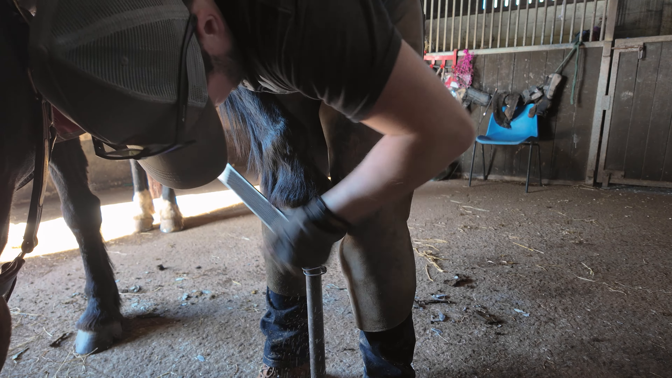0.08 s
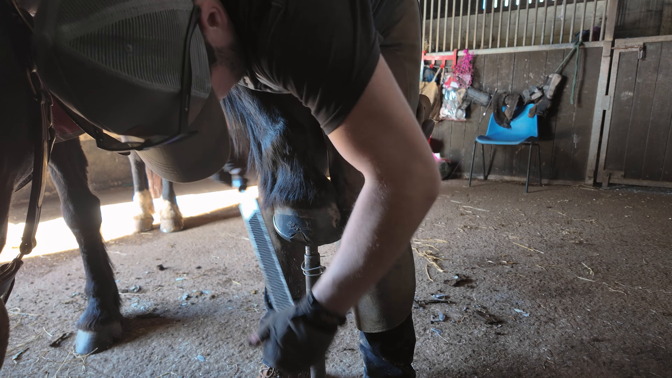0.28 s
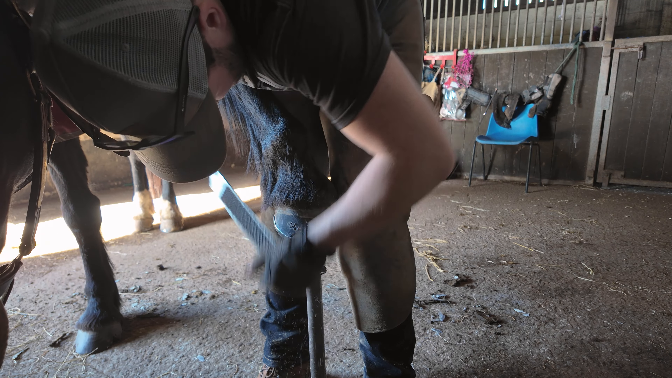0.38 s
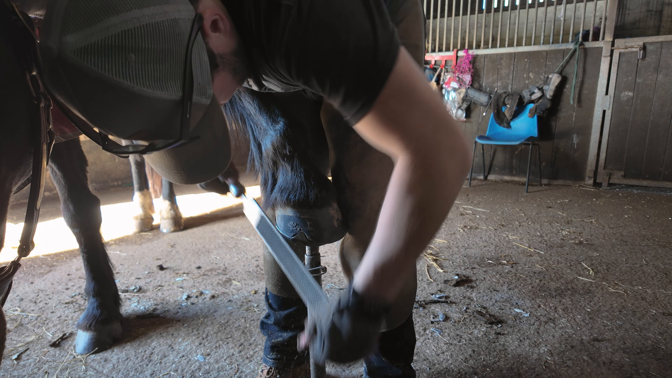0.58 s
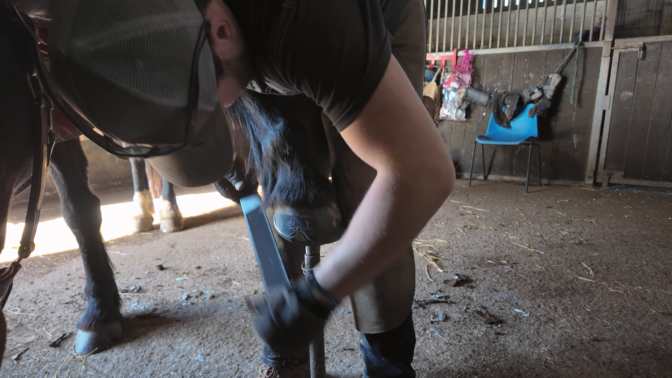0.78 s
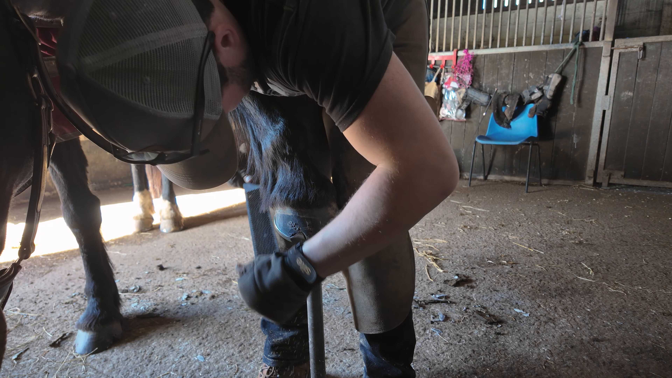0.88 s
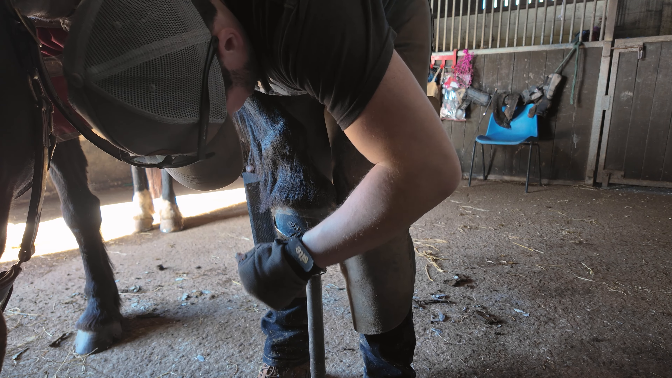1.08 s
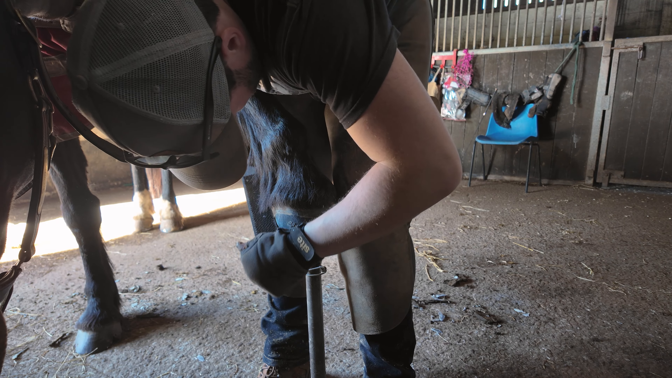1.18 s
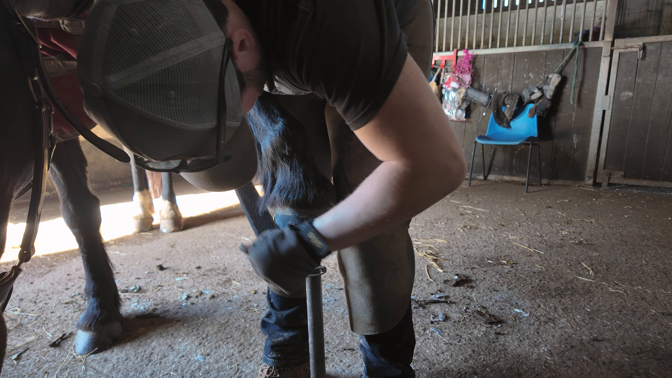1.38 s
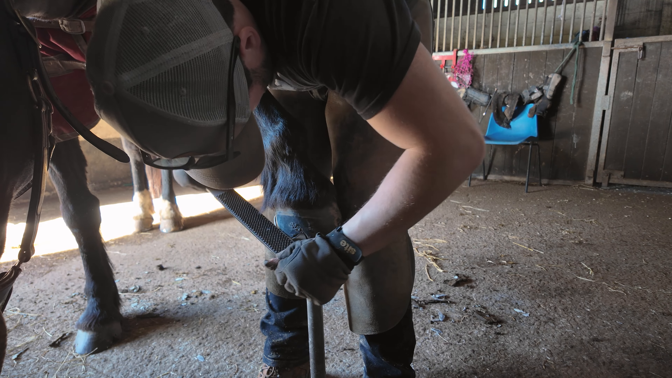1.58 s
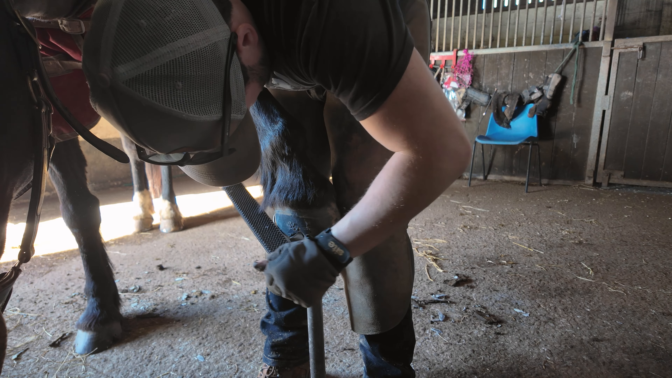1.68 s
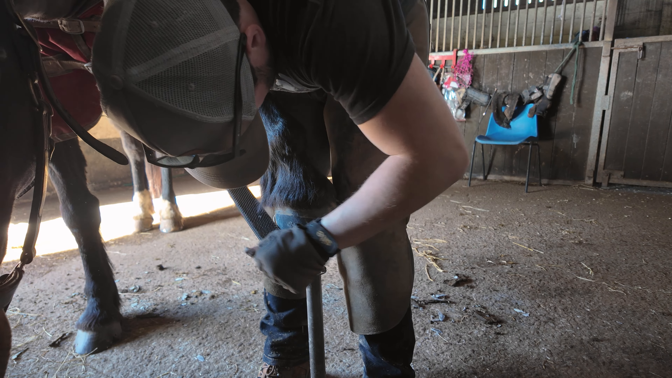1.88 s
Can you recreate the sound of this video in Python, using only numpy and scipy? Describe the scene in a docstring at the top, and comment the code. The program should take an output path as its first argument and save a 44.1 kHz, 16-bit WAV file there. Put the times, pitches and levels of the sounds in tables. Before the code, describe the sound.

Coarse file rasping on hoof horn in a stable, two loud strokes followed by faint scrapes

```python
"""A farrier files a hoof held on a stand in a stable.
From the start: air hush and the light drag of the blade (noise), a faint blade ring, hoof and stand
tones (resonators) and sparse echoes. From 0.16 s and 0.55 s, two hard strokes: random tooth bites tear
horn and ring blade tones weighted by the place touched, tip to heel; noise bursts mark the landings
and sine thumps the rocking stand. From 1.04 s: lighter touches by the same means."""
import sys
import numpy as np
from scipy import signal
from scipy.fft import rfft, irfft
from scipy.io import wavfile

SR = 44100
rng = np.random.default_rng(int(sys.argv[2]) if len(sys.argv) > 2 else 0)


def unload_wav(signal):
    """Save mono or channel-first audio to the path in sys.argv[1] as 16-bit WAV at rate SR, clipped to [-1, 1]."""
    wavfile.write(
        sys.argv[1],
        SR,
        np.round(np.clip(np.atleast_2d(signal).T, -1, 1) * 32767).astype(np.int16),
    )


def gain_from_db(level_db):
    """Convert decibel levels to linear amplitude factors (20 dB per decade)."""
    decades = np.asarray(level_db, float) / 20
    return 10 ** decades


N = 83790


def evened(x):
    """Scales x to power 1."""
    return x / np.sqrt(np.mean(x ** 2) + 1e-20)


def read(points, hz):
    """Interpolates a (hz, value) table over log frequency."""
    f, value = np.transpose(points)
    return np.interp(np.log(hz + 1), np.log(f + 1), value)


def follow(rows, column, outside=None):
    """One column of a timed table as a value for every sample."""
    rows = np.array(rows)
    return np.interp(np.arange(N) / SR, rows[:, 0], rows[:, column], outside, outside)


def colour(x, points):
    """Shapes the spectrum of x by (hz, db), keeping about its power if x is white."""
    gain = gain_from_db(read(points, np.fft.rfftfreq(N, 1 / SR)))
    return irfft(rfft(x) * evened(gain), N)


def resonate(x, hz, width_hz):
    """Double-pole ring with steep flanks, following pitch hz; white noise keeps about its power."""
    r = np.exp(-np.pi * np.sqrt(2) * abs(width_hz) / SR)
    turn = np.exp(2j * np.pi * np.cumsum(hz * np.ones(N)) / SR)
    ring = turn * signal.lfilter([1], [1, -2 * r, r * r], x / turn)
    return np.sqrt(2 * (1 - r * r) ** 3 / (1 + r * r)) * ring.real


def wander(hz):
    """Random drift of power 1, low-passed at hz."""
    return evened(signal.lfilter(*signal.butter(2, hz, fs=SR), rng.standard_normal(N)))


def bites(per_s, spread_db):
    """Teeth catching at random moments, a few of them hard, over weak noise; power 1."""
    size = gain_from_db(spread_db * np.minimum(rng.exponential(1, N), 4)) * rng.choice([-1., 1.], N)
    caught = size * (rng.random(N) < per_s / SR)
    return evened(caught + 0.3 * rng.standard_normal(N))


# stable air spectrum: pitch_hz [Hz], level_db [dB, relative]
AIR_COLOUR = [(30, -2), (95, 2), (180, -6), (350, -4.5), (1000, -21), (1800, -14.5), (4000, -19),
              (7000, -30), (14000, -45)]
AIR_DB = -60.5


def air():
    """Coloured noise: soft hush of the stable, its level drifting slowly."""
    hush = evened(colour(rng.standard_normal(N), AIR_COLOUR))
    return gain_from_db(AIR_DB + 3.8 * wander(1.1)) * hush


# light drag of the blade coming back: start_s [s], level_db [dB]
DRAG = [(0, -47.5), (.03, -51.5), (.15, -51.5), (.4, -70), (.47, -52), (.54, -57), (.78, -51), (.85, -55),
        (.89, -58), (.945, -53.5), (.975, -65), (1.15, -59.5), (1.4, -63.5), (1.63, -54.5), (1.68, -71),
        (1.9, -55.5)]


def drag_bites():
    """Sparse weak tooth catches of the returning blade."""
    return gain_from_db(follow(DRAG, column=1)) * bites(1500, 3.2)


# drag spectrum: pitch_hz [Hz], level_db [dB, relative]
DRAG_COLOUR = [(250, -3.5), (1500, -9.5), (2500, -3), (6500, -7.5), (8000, -16), (11000, -27), (15600, -36)]


def drag_scrape(drag):
    """The drag heard directly, as coloured noise."""
    return colour(drag, DRAG_COLOUR)


# steel blade modes: pitch_hz [Hz], width_hz [Hz], tip_db, heel_db [dB when touched there, relative]
BLADE = [(1720, 220, -9.5, -8), (3014, 84, -5, -13.5), (3505, 44, -28.5, -3.5), (3877, 71, 0.5, -10),
         (4482, 39, -3, -14), (4770, 87, -8.5, 6.5), (5366, 75, -1, -11.5), (6027, 156, 9, -20),
         (6590, 150, -5.5, -9), (6960, 46, 0, -43), (7702, 35, -17, -9), (8920, 69, -22.5, -13),
         (9600, 160, -23, -28), (10610, 83, -29.5, -23), (11650, 20, -30.5, -20.5), (12000, 25, -40, -19)]
RING_DB, DRAG_RING_DB, TAP_RING_DB = -9, -14, 9
BLADE_SAG = 0.018  # share of pitch by which tones are sharp when a hard stroke lands
WOBBLE, WOBBLE_HZ = 0.0076, 47.4  # rms share of pitch under the hardest bite
TONE_FLICKER_DB = 5.5


def blade_ring(cut, drag, tap, hard):
    """Bites, drag and taps excite steel modes, weighted by contact place and bent by pressure."""
    drive = cut + gain_from_db(DRAG_RING_DB) * drag + gain_from_db(TAP_RING_DB) * tap
    at, fresh = contact_place(), freshness()
    ring = np.zeros(N)
    for pitch_hz, width_hz, tip_db, heel_db in BLADE:
        level_db = tip_db + (heel_db - tip_db) * at + TONE_FLICKER_DB * hard * wander(45.3)
        bend = 1 + BLADE_SAG * fresh + WOBBLE * hard * wander(WOBBLE_HZ)
        ring += resonate(drive * gain_from_db(level_db), pitch_hz * bend, width_hz)
    return gain_from_db(RING_DB) * ring


# force passed into hoof and stand: start_s [s], push_db [dB]
PUSH = [(0, -49), (.03, -58), (.21, -65), (.235, -30.5), (.34, -41.5), (.38, -36.5), (.41, -70),
        (.59, -49.5), (.625, -33), (.71, -43.5), (.76, -41), (.82, -65.5), (1.03, -73), (1.05, -48),
        (1.11, -58), (1.13, -111), (1.188, -52), (1.197, -42.5), (1.29, -45.5), (1.32, -62), (1.54, -60.5),
        (1.58, -53), (1.62, -61.5), (1.835, -63), (1.855, -45.5), (1.9, -56.5)]
THUD_DB, THUD_HZ, THUD_WIDTH_HZ = 0, 317, 590


def hoof_drive():
    """Uneven push of the file plus a dull thud at each landing."""
    push = gain_from_db(follow(PUSH, column=1) + 2.2 * wander(49)) * bites(2500, 2.44)
    landing = landing_bursts([level_db + thud_db for start_s, level_db, thud_db in LANDINGS])
    return push + gain_from_db(THUD_DB) * resonate(landing, THUD_HZ, THUD_WIDTH_HZ)


# fixed hoof and stand modes: pitch_hz [Hz], width_hz [Hz], level_db [dB, relative]
HOOF = [(294, 108, -2), (497.4, 31.6, -2), (814, 137, -0.5), (1063, 78, -7.5), (1293, 59, -6.5)]
# hoof mode sinking as a hard stroke settles: first_hz, last_hz, width_hz [Hz], level_db [dB, relative]
SLIDING = (590, 449.6, 27.5, 0.46)
HOOF_DB, PRESSED_DB = -6, -5  # pressing damps the fixed modes


def hoof_tones():
    """Push and thuds shake dull modes; one more sounds only under pressure and sinks in pitch."""
    drive, pressed = hoof_drive(), pressing()
    first_hz, last_hz, width_hz, level_db = SLIDING
    sinking_hz = last_hz + (first_hz - last_hz) * freshness()
    tones = gain_from_db(level_db) * resonate(drive * pressed, sinking_hz, width_hz)
    damped = drive * gain_from_db(PRESSED_DB * pressed)
    for pitch_hz, width_hz, level_db in HOOF:
        tones = tones + gain_from_db(level_db) * resonate(damped, pitch_hz, width_hz)
    return gain_from_db(HOOF_DB) * tones


# echo dying time: pitch_hz [Hz], t60_s [s]
ROOM_T60 = [(300, 0.68), (5000, 0.31), (12000, 0.4)]
ROOM_DB = -13.5


def stable_echo(x):
    """Sparse echoes of random sign, each band dying at its own speed."""
    taps = np.zeros(SR // 2)
    at = np.arange(200, len(taps) - 20, 20)
    taps[at + rng.integers(0, 20, len(at))] = rng.choice([-1., 1.], len(at))
    hz, t, z = signal.stft(taps, SR, nperseg=256)
    decay = gain_from_db(-60 * t / read(ROOM_T60, hz)[:, None])
    tail = signal.istft(z * decay, SR, nperseg=256)[1]
    return gain_from_db(ROOM_DB) * signal.fftconvolve(x, tail / np.linalg.norm(tail))[:N]


# cutting contacts, one list per touch: start_s [s], bite_db [dB], place [0 tip - 1 heel]
CUTS = [
    [(.16, -45, 0.089), (.168, -45.5, 0.24), (.206, -44.5, 0.18), (.232, -20.5, 0.49), (.25, -24.5, 0.12),
     (.28, -30, 0.37), (.296, -26.5, 0.091), (.322, -28.5, 0.57), (.348, -29, 0.35), (.372, -37, 0.31),
     (.385, -48, 1), (.41, -74, 0.45)],
    [(.552, -53, 0.072), (.558, -37, 0.12), (.592, -39.5, 0.064), (.624, -27, 0.26), (.656, -28, 0.35),
     (.672, -27.5, 0.16), (.708, -20.5, 0.5), (.724, -30, 0.34), (.746, -26.5, 0.87), (.76, -83, .75)],
    [(1.039, -45, 0.45), (1.044, -47.5, 0.71), (1.09, -65, 0.57)],
    [(1.19, -112.5, 0.62), (1.197, -56, 0.52), (1.22, -54, 0.36), (1.286, -38.5, 0.24), (1.302, -90, 1)],
    [(1.52, -64.5, 0.8), (1.576, -33.5, 0.86), (1.59, -56, 0.9), (1.61, -56, 0.9), (1.65, -79, 0.63)],
    [(1.832, -75, 0.59), (1.838, -48.5, 0.57), (1.9, -54, 0.84)],
]
CHATTER_DB, CHATTER_HZ, HARD_DB = 2, 70, -33  # hardness is half at HARD_DB


def bite_force():
    """Force of the teeth on the horn, and its hardness from 0 to 1."""
    force = sum(gain_from_db(follow(rows, column=1, outside=-200)) for rows in CUTS)
    return force, force / (force + gain_from_db(HARD_DB))


def contact_place():
    """Where the blade is touched, 0 tip to 1 heel."""
    return np.clip(follow(np.concatenate(CUTS), column=2), 0, 1)


# horn tearing spectrum: pitch_hz [Hz], level_db [dB, relative]
SHAVING = [(300, -10.5), (900, 0), (1800, -6.5), (4500, -1.5), (6800, -3.5), (8000, -13.5), (10000, -19),
           (13000, -35.5), (15600, -36)]
SHAVING_DB = -7.5


def shaving(chatter):
    """Horn tearing off: dense random catches, coloured."""
    return colour(gain_from_db(SHAVING_DB) * chatter * bites(7000, 2.2), SHAVING)


# hard strokes: landing_s [s], lift_s [s]
HARD_STROKES = [(.16, .385), (0.55, .745)]
SETTLE_S, LINGER_S = 0.147, 0.069


def freshness():
    """1 from the landing of a hard stroke, sinking to 0 over its last SETTLE_S."""
    t = np.arange(N) / SR
    return sum((t > landing_s) * np.clip((lift_s - t) / SETTLE_S, 0, 1)
               for landing_s, lift_s in HARD_STROKES)


def pressing():
    """1 during a hard stroke and LINGER_S after its lift, else 0."""
    t = np.arange(N) / SR
    return sum((t > landing_s) * (t < lift_s + LINGER_S) for landing_s, lift_s in HARD_STROKES)


# blade set down on the horn, or snagging: start_s [s], level_db [dB], thud_db [dB re level_db]
LANDINGS = [(0.1647, -41.5, -7.5), (0.5545, -39, -3), (.706, -39, -4), (1.0415, -47.5, 1), (1.195, -49, 2),
            (1.562, -58.5, -4)]


def landing_bursts(levels_db):
    """A noise burst decaying over a few ms at each landing, low-passed."""
    out, t = np.zeros(N + SR), np.arange(400) / SR
    for (start_s, *_), level_db in zip(LANDINGS, levels_db):
        burst = rng.standard_normal(len(t)) * np.exp(-t / 0.0035)
        out[round(start_s * SR):][:len(t)] += gain_from_db(level_db) * burst
    return signal.lfilter(*signal.butter(2, 7500, fs=SR), out[:N])


def landing_tick(tap):
    """Broad short resonance of each landing."""
    tick_db, tick_hz, width_hz = 5, 1540, 2040
    return gain_from_db(tick_db) * resonate(tap, tick_hz, width_hz)


# stand rocking on the floor: start_s [s], level_db [dB], pitch_hz [Hz], t60_s [s]
THUMPS = [(0.219, -37, 101.4, 0.17), (0.31, -36.5, 93.4, 0.31), (.556, -35, 117, 0.065),
          (0.693, -40.5, 110.8, 0.24), (1.041, -24.5, 129, 0.042), (1.174, -40.5, 117, 0.12),
          (1.221, -32, 128, 0.079), (1.572, -34, 116.5, 0.084), (1.841, -44.5, 119, 0.19)]
THUMP_RISE_S = 0.0072


def stand_thumps():
    """Low sines with a soft onset and exponential decay."""
    out = np.zeros(N)
    for start_s, level_db, pitch_hz, t60_s in THUMPS:
        t = np.maximum(np.arange(N) / SR - start_s, 0)
        envelope = gain_from_db(level_db - 60 * t / t60_s) * (1 - np.exp(-t / THUMP_RISE_S))
        out += envelope * np.sin(2 * np.pi * pitch_hz * t)
    return out


def scene():
    """File, hoof and stand, with the stable's echoes and air."""
    force, hard = bite_force()
    chatter = force * gain_from_db(CHATTER_DB * wander(CHATTER_HZ))
    cut = chatter * bites(per_s=3500, spread_db=4)
    drag = drag_bites()
    tap = landing_bursts([level_db for start_s, level_db, thud_db in LANDINGS])
    rasp = drag_scrape(drag) + blade_ring(cut, drag, tap, hard) + shaving(chatter) + landing_tick(tap)
    near = rasp + hoof_tones() + stand_thumps()
    return (near + stable_echo(near) + air())[None]


def low_pass(x):
    """Removes everything above the highest recorded frequency."""
    return signal.sosfilt(signal.butter(12, 15690, fs=SR, output="sos"), x)


def record(dry):
    """The microphone drops the deepest bass."""
    bass_cut = signal.butter(4, 55, "high", fs=SR, output="sos")
    return low_pass(signal.sosfilt(bass_cut, dry))


dry = scene()
out = record(dry)
unload_wav(out)
```